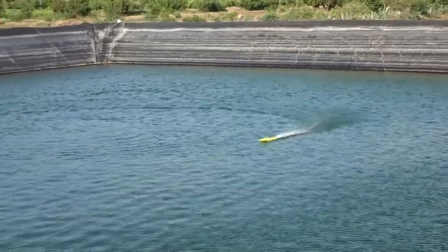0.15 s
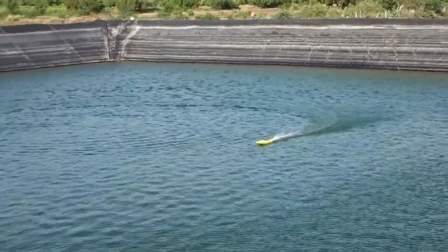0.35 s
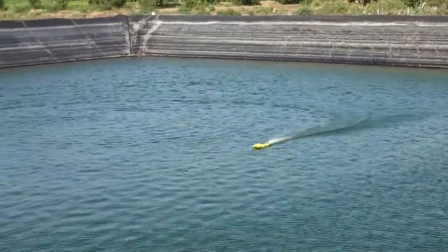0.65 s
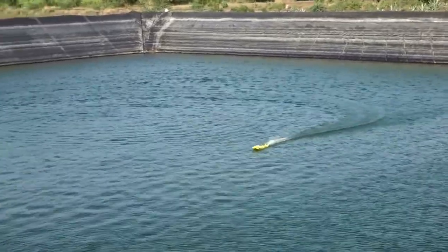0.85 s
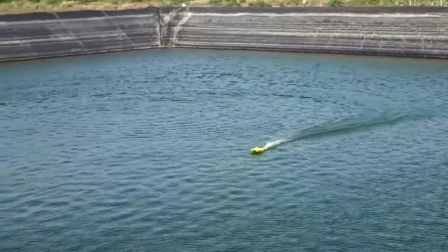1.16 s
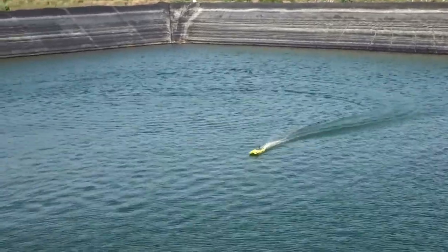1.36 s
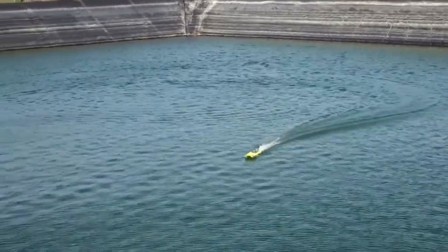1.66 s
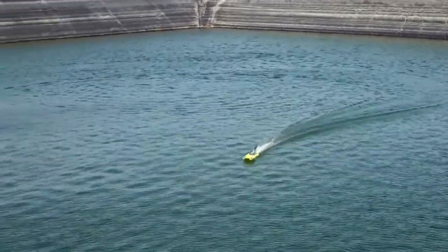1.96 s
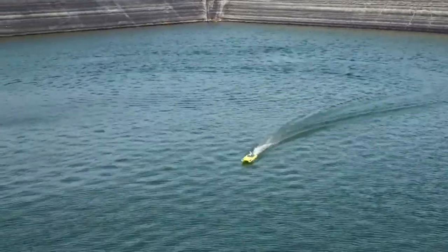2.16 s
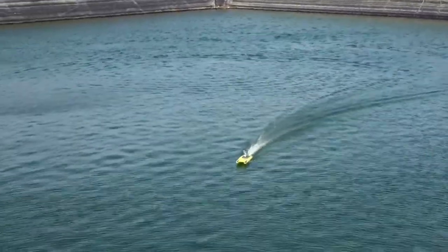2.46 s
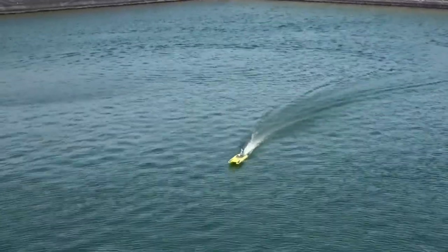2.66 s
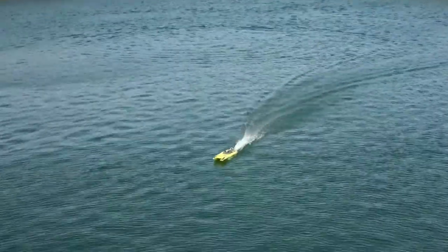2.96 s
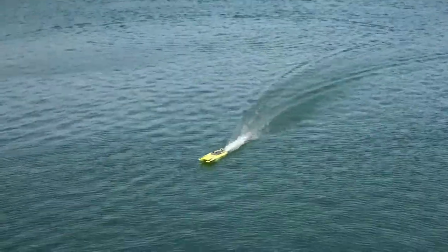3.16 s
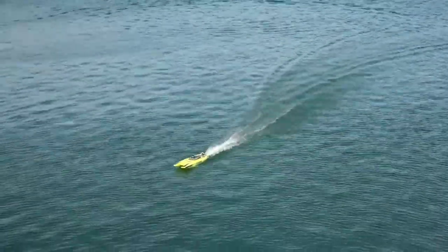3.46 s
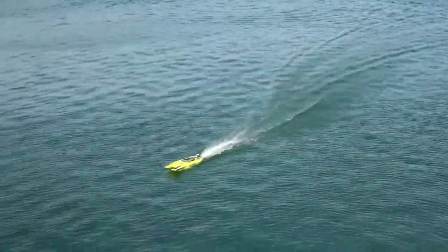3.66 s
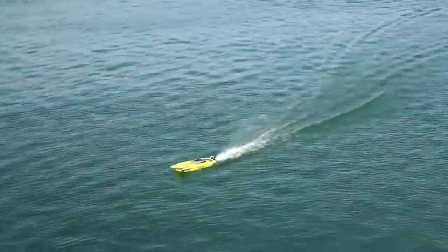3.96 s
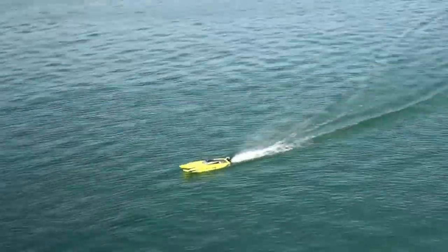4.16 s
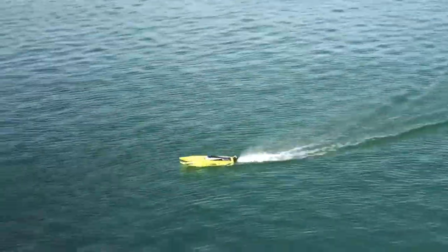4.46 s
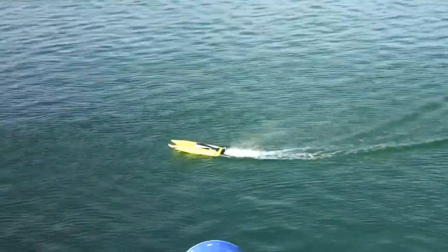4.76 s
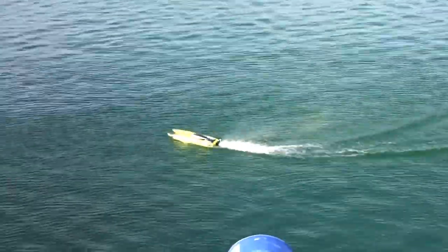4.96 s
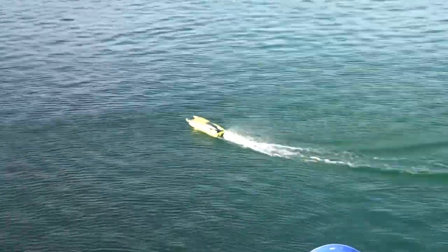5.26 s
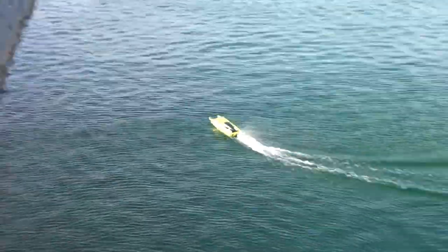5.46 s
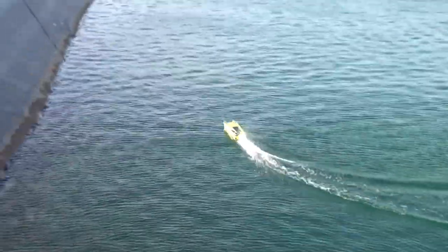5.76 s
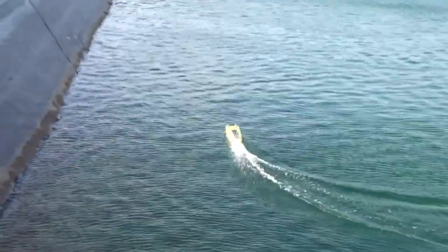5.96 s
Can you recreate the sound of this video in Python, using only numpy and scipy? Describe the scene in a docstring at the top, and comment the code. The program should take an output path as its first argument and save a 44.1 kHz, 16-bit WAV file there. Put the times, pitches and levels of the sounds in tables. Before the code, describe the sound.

Wind buffets the microphone over a model speedboat's high wavering whine and rushing spray; a small bird calls three times midway.

```python
"""Electric speedboat on a windy reservoir

A small electric speedboat curves across the water towards a microphone on the bank.
Its controller whistles and its motor whines, as smeared tones; shaped noise makes the hiss of the spray.
The motor races as the propeller loses grip. Trains of short pressure swings make gusts flutter on
the microphone, and a small bird calls three times in gliding tones."""
import sys
import numpy as np
from scipy import signal
from scipy.fft import rfft, irfft, next_fast_len
from scipy.io import wavfile
from scipy.ndimage import uniform_filter1d, minimum_filter1d, map_coordinates

SR = 44100
rng = np.random.default_rng(int(sys.argv[2]) if len(sys.argv) > 2 else 0)


def dump(signal):
    """Clip the signal to [-1, 1] and save it as 16-bit WAV at the path in sys.argv[1]."""
    limited = np.clip(np.atleast_2d(signal).T, -1, 1)
    pcm = np.round(limited * 32767).astype(np.int16)
    wavfile.write(sys.argv[1], SR, pcm)


N = 269892

# the controller's switching tone, sinking as the boat stops approaching: time_s, pitch_hz
SWITCHING_PITCH = [(0, 7798), (3.4, 7800), (4.2, 7768), (5.1, 7697), (5.94, 7676), (6.12, 7620)]
# the whistle of that tone: time_s, level_db
WHISTLE_LEVEL = [(0.0, -51), (0.41, -55.5), (0.61, -46.5), (1.22, -43), (1.64, -60.5), (2.12, -44),
                 (2.42, -55.5), (2.54, -45.5), (2.92, -57.5), (3.12, -43.5), (4.8, -53.5), (4.95, -59),
                 (5.95, -52.5)]
# the motor's whine, high where the propeller loses grip: time_s, pitch_hz
MOTOR_PITCH = [(0, 3830), (.32, 3320), (.47, 3262), (.75, 3322), (1.1, 3328), (1.45, 3280), (1.9, 3325),
               (2.5, 3272), (2.95, 3345), (3.38, 3278), (3.6, 3338), (4.0, 3338), (4.38, 3265),
               (4.68, 3325), (5.1, 3315), (5.42, 3250), (5.75, 3305), (5.93, 3298), (6.02, 3970),
               (6.12, 5400)]
# the whine: time_s, level_db
WHINE_LEVEL = [(0.04, -45), (0.18, -55.5), (0.33, -49.5), (0.64, -45), (0.8, -59), (1.1, -50), (1.3, -56.5),
               (2.2, -47), (2.7, -54.5), (3.29, -44.5), (3.36, -33), (3.49, -47), (3.63, -35.5),
               (3.71, -54), (4.0, -44), (4.15, -57), (4.3, -46.5), (4.85, -56.5), (5.4, -43.5), (5.56, -52),
               (5.93, -44.5), (6.02, -50), (6.12, -62)]
# other motor partials, which come and go as the hull turns:
# middle_s, half_length_s, multiple_of_whine (ratio), level_db
MOTOR_PARTIALS = [(1.05, .4, 2, -61.5), (2.16, 1.07, 1.5, -61), (3.66, 0.57, 2, -67),
                  (3.2, 1.4, 2 / 3, -56)]
# side tones where the motor modulates the whistle:
# middle_s, half_length_s, distance_below_whistle (multiples of the whine), level_db
SIDE_TONES = [(.95, .35, .5, -65), (2.1, .7, 1, -59), (3.2, .25, .5, -60)]
LOAD_SAG_HZ = 4  # drop in whine pitch per dB of load
SHUDDER = 0.04  # pitch tremble, as a share of the rise above cruising pitch
SMEAR_NEAR, SMEAR_PER_DOUBLING = 0.15, 0.3  # reflected share at NEAR_M, and its gain per doubling


def drive():
    """Switching and rotation give steady tones, smeared by ripples and cleaner once the boat is near."""
    t = np.arange(N) / SR
    smear = SMEAR_NEAR + SMEAR_PER_DOUBLING * remoteness()
    switching_hz = curves(SWITCHING_PITCH)[0]
    whistle_db = curves(WHISTLE_LEVEL)[0]
    motor_hz = curves(MOTOR_PITCH)[0]
    whine_db = curves(WHINE_LEVEL)[0]
    whistle = amp(2.5 * wobble(30)) * scattered(switching_hz, share=smear, width_hz=23.5)

    # chop loads and unloads the propeller; out of the water it races and shudders
    load_db = wobble(30)
    race_hz = np.maximum(motor_hz - np.median(motor_hz), 0)
    shudder_hz = SHUDDER * race_hz * wobble(300)
    whine_hz = motor_hz - LOAD_SAG_HZ * load_db + shudder_hz
    whine = amp(load_db) * scattered(whine_hz, share=smear, width_hz=21)

    partials = [(middle, half, order * motor_hz, db) for middle, half, order, db in MOTOR_PARTIALS]
    partials += [(middle, half, switching_hz - order * motor_hz, db)
                 for middle, half, order, db in SIDE_TONES]
    faint = 0
    for middle, half, hz, db in partials:
        swell = np.exp(-((t - middle) / half) ** 4)
        faint = faint + amp(db) * swell * scattered(hz, share=3 * smear, width_hz=55)
    return amp(whistle_db) * whistle + amp(whine_db) * whine + faint


def scattered(pitch, share, width_hz):
    """A stereo tone plus its reflections off moving ripples, which smear it into a narrow band."""
    def ripple_band(hz):
        return 1 / (1 + (hz / width_hz) ** 2) ** .5 / (1 + (hz / 600) ** 4)

    noise = filtered(rng.standard_normal((2, 3, N)), ripple_band)
    paths = unit(noise[0]) + 1j * unit(noise[1])
    ripples = paths[0] + paths[1:]  # one path shared, one for each side
    share = np.clip(share, 0, 1)
    carrier = np.exp(2j * np.pi * np.cumsum(pitch) / SR)
    return np.sqrt(2) * np.real((np.sqrt(1 - share) + np.sqrt(share) * ripples) * carrier)


# spectra of the spray's layers, each: frequency_hz, relative_level_db (per Hz)
CHURN_SPECTRUM = [(150, -16), (750, 1), (2300, -2.5), (2700, -7.5), (4000, -22.5), (10000, -40)]  # water churned by the hull
RUSH_SPECTRUM = [(2400, -6), (3000, 0.5), (3600, 4), (4500, -8.5), (7000, -12.5), (9000, -52)]  # the rooster tail
MIST_SPECTRUM = [(4000, 8), (9300, 3.5), (11000, -5), (15500, -20)]  # its fine mist
FIZZ_SPECTRUM = [(5000, -5.5), (9000, -2), (15500, -6)]  # the finest drops
FROTH_SPECTRUM = [(700, -22), (1900, -6), (2500, 2), (3300, -18), (8000, -52)]  # the gurgle of drawn-in air
# the rooster tail's hiss: time_s, level_db
RUSH_LEVEL = [(0.25, -51), (1.22, -45.5), (2.26, -47), (3.32, -43), (4.4, -49.5), (5.9, -49)]
# the propeller draws air in the turn: time_s, level_db
GURGLE_LEVEL = [(4.6, -68.5), (5.3, -46), (5.92, -49), (6.07, -37.5)]
# the spray leaps as the hull slaps a wavelet; in negative rows the hiss dips briefly:
# time_s, change_db, half_width_s
LEAPS_AND_DIPS = [(0.718, 8, 0.013), (0.849, 7, .008), (1.115, 5.5, 0.04), (1.36, 7, .005),
                  (2.37, 6, 0.025), (2.99, -4, 0.17), (5.78, -5, .04)]
CHURN_DB, CHURN_LOSS_DB = -42.5, 3.5  # level at NEAR_M, loss per doubling of distance
FIZZ_DB, FIZZ_LOSS_DB = -62, 15.5  # the same for the fizz
MIST_DB = -54.5


def spray():
    """Noise for churned water, rooster tail and mist surges as the hull skips; fizz carries least far."""
    far = remoteness()
    chop = .5 + 0.4 * far  # the water is rougher away from the bank
    t = np.arange(N) / SR
    skip_db = chop * (2.5 * wobble(14) + 2.7 * wobble(80))
    change_db = sum(db * np.exp(-((t - s) / width) ** 2) for s, db, width in LEAPS_AND_DIPS)

    churn = amp(CHURN_DB - CHURN_LOSS_DB * far) * water(CHURN_SPECTRUM)
    rush = amp(curves(RUSH_LEVEL)[0]) * water(RUSH_SPECTRUM)
    mist = amp(MIST_DB + chop * wobble(14.0)) * water(MIST_SPECTRUM)
    fizz = amp(FIZZ_DB - FIZZ_LOSS_DB * far) * water(FIZZ_SPECTRUM)
    gurgle = amp(curves(GURGLE_LEVEL)[0]) * water(FROTH_SPECTRUM)

    # the finer the drops, the more they follow each change
    coarse = combed(amp(change_db / 2) * churn + amp(0.9 * change_db) * rush)
    fine = amp(change_db) * (mist + fizz)
    return amp(skip_db) * (gurgle + coarse + fine)


# how alike the spray is at the two microphone ports: frequency_hz, likeness (0 to 1)
BOAT_ALIKE = [(200, .8), (3500, .65), (6000, .25)]


def water(spectrum):
    """Stereo water noise of rms 1, slightly uneven from patch to patch in time and frequency."""
    z = signal.stft(rng.standard_normal((2, N)), nperseg=512)[2]
    field = uniform_filter1d(rng.standard_normal(z.shape[1:]), size=2, axis=0)
    field = uniform_filter1d(field, size=12, axis=1)
    pair = signal.istft(z * amp(1.3 * unit(field)), nperseg=512)[1][:, :N]

    def mid_and_side(hz):
        turn = np.arccos(np.clip(along(BOAT_ALIKE, hz), -1, 1)) / 2
        return amp(along(spectrum, hz)) * [np.cos(turn), np.sin(turn)]

    mid, side = filtered(pair, mid_and_side)
    return unit(np.array([mid + side, mid - side]))


# notches that the bank's bounce cuts into the spray: time_s, spacing_hz
NOTCH_SPACING = [(0, 548), (2.2, 522), (3.1, 550), (4.6, 520), (5.4, 445), (6.1, 400)]
BOUNCE_SHARE = 0.42


def combed(x):
    """A bounce off the bank, delayed and inverted, cuts evenly spaced notches that slide with the boat."""
    t = np.arange(N) / SR
    lag_s = 1 / curves(NOTCH_SPACING)[0]
    bounce = np.array([np.interp(t - lag_s, t, side) for side in x])
    return x - BOUNCE_SHARE * bounce


# the boat's path: time_s, distance_from_microphone_m
DISTANCE = [(0, 24.2), (2.95, 22), (3.4, 14.1), (4.8, 15.3), (6.12, 15.8)]
NEAR_M = 16  # reference distance


def remoteness():
    """Doublings of the boat's distance beyond NEAR_M; negative when it is closer."""
    return np.log2(curves(DISTANCE)[0] / NEAR_M)


# the hardest eddies: time_s, swing_db, pitch_hz
HARD_EDDIES = [(0.499, -18.5, 700), (0.537, -7, 746), (0.624, -15, 397), (1.031, -13, 760),
               (1.081, -17.5, 331), (1.448, -10.5, 535), (1.76, -13.5, 702), (1.802, -8, 533),
               (1.826, -8.5, 567), (1.872, -15, 362), (2.126, -15, 624), (2.49, -12, 520),
               (2.586, -10, 714), (2.65, -1.5, 920), (2.807, -15, 490), (2.869, -16, 680),
               (2.953, -11, 610), (3.011, -6.5, 735), (4.061, -13.5, 437), (4.444, -12.5, 725),
               (4.774, -12, 453), (4.894, -15, 590), (4.965, -9, 600), (5.066, -11, 507), (5.115, -9, 600),
               (5.135, -10.5, 930), (5.463, -10.5, 490), (5.477, -13, 407), (5.533, -11.5, 555),
               (5.655, -13, 784), (5.709, -12, 480), (5.739, -9.5, 566), (5.755, -9.5, 615),
               (5.887, -16, 284), (6.045, -16, 374)]
# low rumble: frequency_hz, relative_level_db (per Hz)
RUMBLE_SPECTRUM = [(20, -55), (60, -13.5), (130, -1.5), (900, -61)]
# phase of the wind between the ports: frequency_hz, left_lead_rad
WIND_LEAD = [(40, 0.083), (200, 0.85), (1200, 1.93)]
TYPICAL_GUST_DB = -30
# each layer's level in a typical gust, and dB gained per dB of gust (the body gains 1)
RUMBLE_DB, RUMBLE_GROWS = -44, 0.93
BODY_DB = -27.5
EDGE_DB, EDGE_GROWS = -33, 1.15
CRACK_DB, THUD_DB = -10.5, -9  # a hard eddy's crack and thud, against its main swing
BREAKUP_S = 0.003  # how far before or after the main swing they may land


def wind():
    """Gusts shed eddies across the microphone; harder gusts shed smaller, brighter ones."""
    gust_db = gusts() - TYPICAL_GUST_DB + 2.2 * wobble(100)
    body_train = flutter(gust_db, count=3000, centre_hz=391.6, spread=0.4, spiky_db=4)
    body = amp(BODY_DB + gust_db) * body_train
    edge_trains = [flutter(gust_db, count=2000, centre_hz=655, spread=0.39, spiky_db=0.5)
                   for _ in range(2)]
    edge = amp(EDGE_DB + EDGE_GROWS * gust_db) * np.array(edge_trains)

    # each port has some rumble of its own
    noise = rng.standard_normal(N) + rng.standard_normal((2, N)) / 2
    lows = filtered(noise, lambda hz: amp(along(RUMBLE_SPECTRUM, hz)))
    rumble = amp(RUMBLE_DB + RUMBLE_GROWS * gust_db) * unit(lows)

    s, db, hz = np.transpose(HARD_EDDIES)
    hardest = puffs(s, amp(db), hz, cycles=0.95)
    # each hard eddy breaks up: a crack an octave above, a thud an octave below
    crack_s = s + BREAKUP_S * rng.uniform(-0.98, 1, len(s))
    crack = puffs(crack_s, amp(db + CRACK_DB), 2 * hz, cycles=0.89)
    thud_s = s + BREAKUP_S * rng.uniform(-0.94, 1, len(s))
    thud = puffs(thud_s, amp(db + THUD_DB), hz / 2, cycles=0.63)

    wind_tilt = [(100, 0), (500, -1.4)]  # frequency_hz, left_minus_right_db
    return ports(body + edge + rumble + hardest + crack + thud, WIND_LEAD, wind_tilt)


# gusts on the microphone: start_s, length_s, strength_db
GUSTS = [(0.223, 0.048, -44), (0.506, 0.17, -34), (0.663, 0.3, -37.5), (0.907, 0.36, -32.5),
         (1.357, 0.13, -31), (1.494, 0.21, -35), (1.674, 0.17, -28), (2.115, 0.057, -31.5),
         (2.368, 0.023, -28.5), (2.479, 0.028, -30), (2.548, 0.07, -27), (2.902, 0.29, -28),
         (3.21, 0.074, -36.5), (3.371, 0.024, -41), (3.467, 0.013, -38.5), (3.616, 0.33, -34.5),
         (3.689, 0.023, -26.5), (3.875, 0.025, -30), (4.012, 0.067, -28.5), (4.219, 0.31, -36),
         (4.442, 0.24, -32), (4.725, 0.4, -27.5), (5.282, 0.13, -28), (5.467, 0.31, -32.5),
         (5.819, 0.27, -34.5), (6.046, 0.096, -31.5)]
GUST_ATTACK_S, GUST_RELEASE_S = 0.012, 0.079  # time to rise, and to fall, by 20 dB
BREEZE_DB, BREEZE_DB_PER_S = -61, 3.5  # the air between gusts freshens slowly


def gusts():
    """Wind strength in dB: each gust rises quickly, holds and dies away over a faint breeze."""
    t = np.arange(N) / SR
    strength_db = BREEZE_DB + BREEZE_DB_PER_S * t
    for start, length, db in GUSTS:
        before = np.maximum(start - t, 0) / GUST_ATTACK_S
        after = np.maximum(t - start - length, 0) / GUST_RELEASE_S
        strength_db = np.maximum(strength_db, db - 20 * (before + after))
    return strength_db


EDDY_RISE_PER_DB = 0.02  # share by which the eddies' pitch rises per dB of gust


def flutter(gust_db, count, centre_hz, spread, spiky_db):
    """A dense train of uneven eddies at a steady mean level, higher in pitch in harder gusts."""
    at = rng.integers(N, size=count)
    scatter = spread * np.clip(rng.standard_normal(count), -2, 2)
    pitch = centre_hz * np.exp(EDDY_RISE_PER_DB * gust_db[at] + scatter)
    spikes_db = spiky_db * np.minimum(rng.exponential(size=count), np.pi)
    sizes = np.sqrt(pitch) * amp(spikes_db)
    train = puffs(at / SR, sizes, pitch, cycles=0.72)
    power = uniform_filter1d(uniform_filter1d(train ** 2, size=900), size=900)
    return train / np.sqrt(np.abs(power) + 1e-9)


def puffs(times, sizes, hz, cycles):
    """Each eddy is a pressure swing that swells and dies within a cycle or two."""
    t = np.arange(-SR // 80, SR // 80)  # samples around each eddy
    turns = hz[:, None] * t / SR
    swell = np.exp(-(turns / cycles) ** 2)
    phase = rng.random((len(times), 1))
    waves = sizes[:, None] * swell * np.cos(2 * np.pi * (turns + phase))
    # samples beyond either end fall into two spare bins, cut off here
    index = np.clip(np.round(times[:, None] * SR).astype(int) + t, -1, N) + 1
    return np.bincount(index.ravel(), waves.ravel(), N + 2)[1:-1]


# a small bird, levels before panning: start_s, level_db, length_s
BIRD_CALLS = [(3.252, -49, 0.12), (3.514, -48, 0.079), (3.808, -44.5, 0.13)]
# the shape of every call: time_after_start_s, pitch_hz, relative_level_db
CALL_SHAPE = [(0, 6600, -7), (0.013, 7000, -1), (.04, 6530, 0.5), (.105, 4870, -10)]
CALL_RELEASE_S = 0.016
BIRD_SMEAR = 0.2  # reflected share


def bird():
    """Three thin gliding tones, a quick rise and a longer fall; a short call breaks off part way down."""
    after, hz, db = np.transpose(CALL_SHAPE)
    t = np.arange(N) / SR
    song = 0
    for start, level, length in BIRD_CALLS:
        envelope = amp(level + np.interp(t, start + after, db, -120, -120))
        release = np.clip((start + length - t) / CALL_RELEASE_S, 0, 1)
        tone = scattered(np.interp(t, start + after, hz), share=BIRD_SMEAR, width_hz=140)
        song = song + envelope * release * tone
    return song * amp([[-4], [-1]])  # left, right dB


def amp(db):
    """Decibels to amplitude."""
    return 10 ** (np.asarray(db) / 20)


def unit(x):
    """Scale to an rms of 1."""
    return x / np.sqrt(np.mean(x ** 2) + 1e-20)


def along(points, hz):
    """Read (Hz, value) points on a log frequency axis."""
    f, v = np.transpose(points)
    return np.interp(np.log(hz + 1), np.log(f + 1), v)


def curves(rows):
    """One value per sample for each column after the time."""
    s, *cols = np.transpose(rows)
    return [np.interp(np.arange(N) / SR, s, c) for c in cols]


def wobble(rate):
    """A smooth random curve, rate knots a second."""
    knots = rng.standard_normal(int(N * rate / SR) + 4)
    return map_coordinates(knots, [np.arange(N) * rate / SR])


def filtered(x, response):
    """Filter x by a complex response of frequency."""
    m = next_fast_len(N + SR // 2)
    return irfft(rfft(x, m) * response(np.fft.rfftfreq(m, 1 / SR)), m)[..., :N]


def ports(x, lead, tilt):
    """The two microphone ports differ in phase and level, half the difference on each side."""
    sides = np.array([[.5], [-.5]])

    def response(hz):
        return np.exp(1j * sides * along(lead, hz)) * amp(sides * along(tilt, hz))

    return filtered(x, response)


# phase of the boat between the ports: frequency_hz, left_lead_rad
BOAT_LEAD = [(300, 0.84), (900, 1.7), (1800, -2), (3300, -1.48), (7800, -3)]
# level of the boat between the ports: frequency_hz, left_minus_right_db
BOAT_TILT = [(200, -1), (2700, -1.5), (4500, -5), (5400, 0), (6800, -8), (12000, -17)]


def scene():
    """The boat as the microphone pair hears it, with the wind and the bird."""
    boat = ports(drive() + spray(), BOAT_LEAD, BOAT_TILT)
    return boat + wind() + bird()


TOP_HZ = 15780  # upper band limit


def record(dry):
    """A limiter dips the level briefly around peaks above 0.45; then a steep cut removes the top treble."""
    needed = np.minimum(1, 0.45 / (np.abs(dry).max(axis=0) + 1e-9))
    held = minimum_filter1d(needed, size=600, origin=250)
    gain = uniform_filter1d(held, size=80)
    return filtered(dry * gain, lambda hz: hz < TOP_HZ)


dry = scene()
out = record(dry)
dump(out)
```